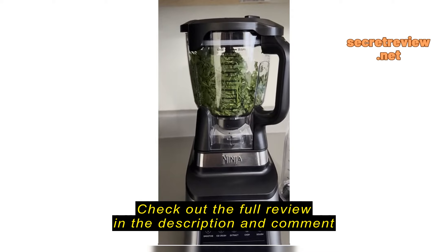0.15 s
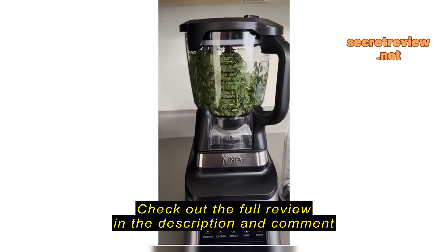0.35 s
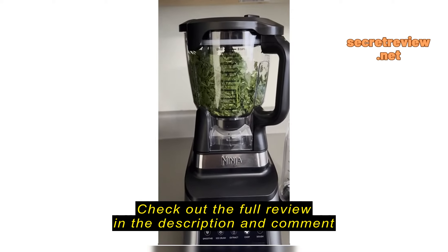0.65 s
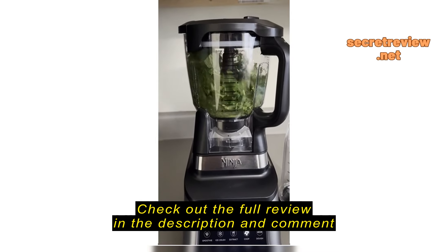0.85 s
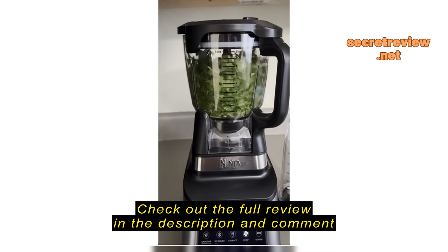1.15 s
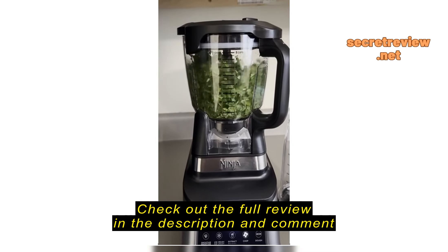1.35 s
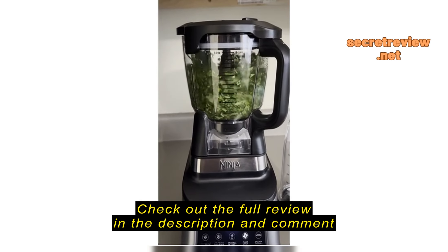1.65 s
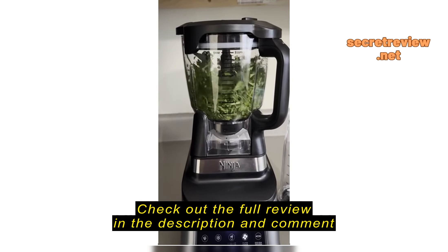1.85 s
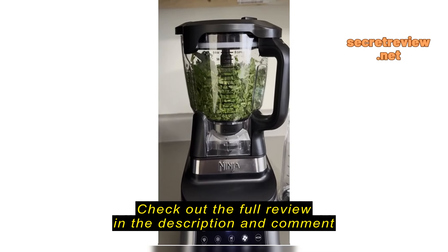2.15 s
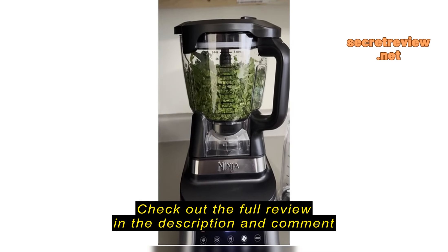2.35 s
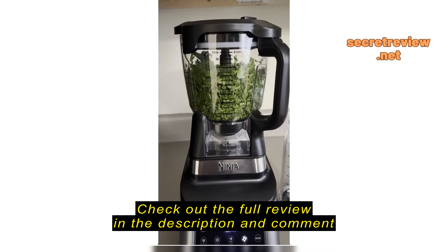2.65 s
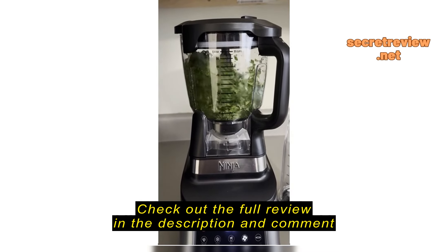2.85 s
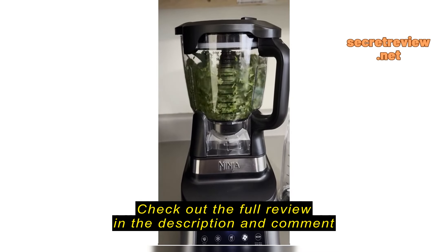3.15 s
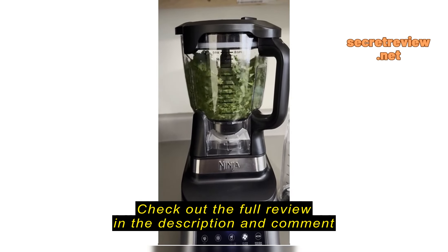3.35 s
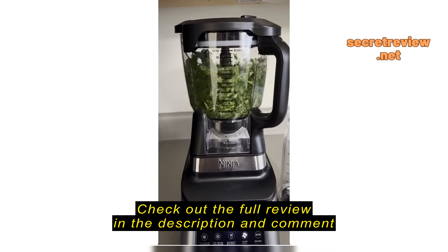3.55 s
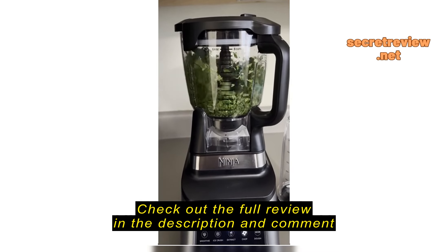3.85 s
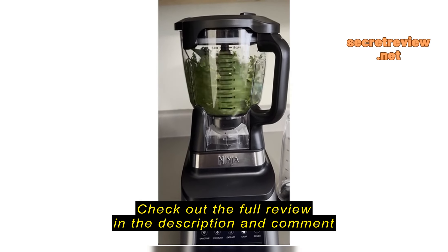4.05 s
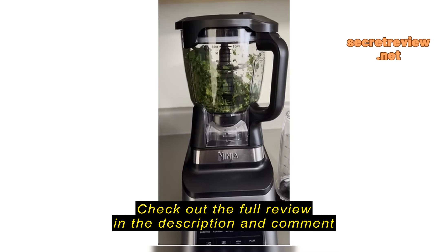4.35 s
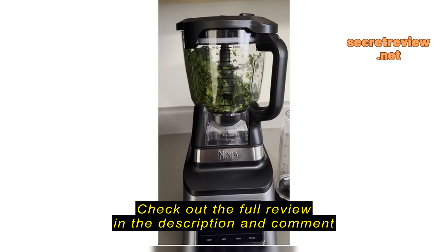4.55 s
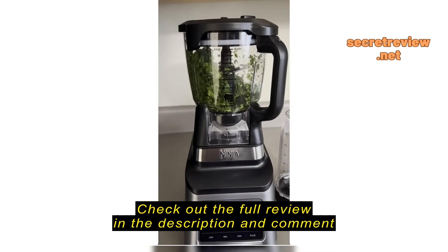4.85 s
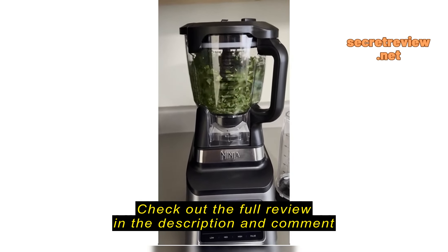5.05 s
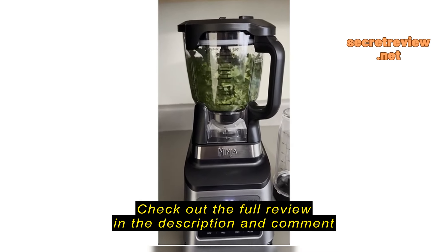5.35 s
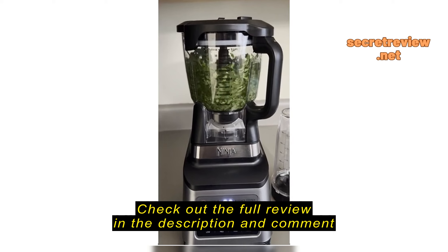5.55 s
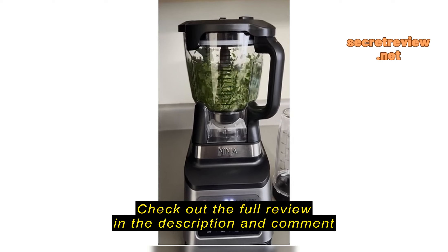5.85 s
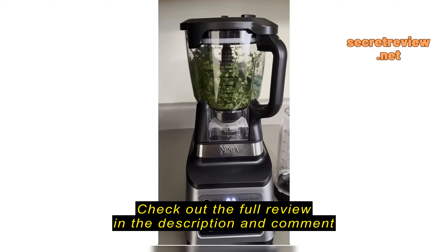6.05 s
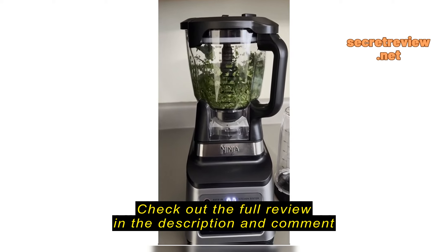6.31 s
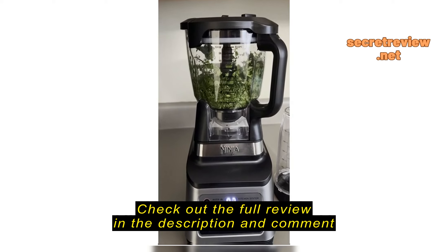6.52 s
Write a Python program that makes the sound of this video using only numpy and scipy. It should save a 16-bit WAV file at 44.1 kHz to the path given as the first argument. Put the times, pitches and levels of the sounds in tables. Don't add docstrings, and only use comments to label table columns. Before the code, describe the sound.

Close by in a quiet kitchen, a blender already at full power roars, then coasts down with a falling whine as leaves batter the plastic jug. After a short pause of low room rumble, a second press kicks in sharply, knocks loudly and winds down. A third pulse repeats this and dies away. A hand-held two-port microphone picks up faint taps on its case.

```python
import sys
import numpy as np
from scipy import signal
from scipy.fft import rfft, irfft, next_fast_len
from scipy.io import wavfile

SR = 44100
rng = np.random.default_rng(int(sys.argv[2]) if len(sys.argv) > 2 else 0)


def voltage_ratio(decibels):
    exponent = np.asarray(decibels, float) / 20
    return 10 ** exponent


def unload_wav(signal):
    wavfile.write(
        sys.argv[1],
        SR,
        np.round(np.clip(np.atleast_2d(signal).T, -1, 1) * 32767).astype(np.int16),
    )


N = 294588
TIME = np.arange(N) / SR
SIZE = next_fast_len(N + SR)
HZ = np.maximum(np.arange(SIZE // 2 + 1) * SR / SIZE, 1)
TOP_HZ = 15950
RIPPLE_HZ = 120.0

# start_s, full_speed_s
PULSES = [
    (-.43, .045),
    (2.078, 2.56),
    (4.577, 5.085),
]
# pitch_hz, width_hz, level_db over the broad colour
BASE_MODES = [(66, 8, 15), (118, 30, 6), (145, 30, 3), (207, 24, 9), (340, 20, 17)]


def rms_one(x):
    return x / np.sqrt(np.mean(x ** 2) + 1e-20)


def in_time(tables):
    s, *columns = np.concatenate(tables).T
    return [np.interp(TIME, s, column) for column in columns]


def running(tables):
    return sum((TIME >= rows[0][0]) & (TIME <= rows[-1][0]) for rows in tables)


def at_hz(points):
    hz, level = np.array(points).T
    return np.interp(np.log(HZ), np.log(np.maximum(hz, 1)), level)


def filtered(x, response):
    return irfft(rfft(x, SIZE) * response, SIZE)[..., :N]


def modes(table):
    response = 1
    for hz, width_hz, db in table:
        response = response + (voltage_ratio(db) - 1) / (1 + 1j * (HZ - hz ** 2 / HZ) / width_hz)
    return response


def band(low_hz, high_hz):
    return 1 / np.sqrt((1 + (low_hz / HZ) ** 8) * (1 + (HZ / high_hz) ** 8))


def drift(rate):
    every = 40
    r = np.exp(-2 * every * np.pi * rate / SR)
    noise = rng.standard_normal(N // every + 2002)
    slow = signal.lfilter([1], [1, -2 * r, r * r], noise)[2000:]
    return np.interp(np.arange(N) / every, np.arange(len(slow)), rms_one(slow))


def grains(per_s, spread_db, noise):
    sizes = voltage_ratio(spread_db * np.minimum(rng.exponential(1, N), 4)) * rng.choice([-1, 1], N)
    impacts = sizes * (rng.random(N) < per_s / SR)
    return rms_one(impacts) + noise * rng.standard_normal(N)


def room_tone():
    # pitch_hz, level_db (per Hz)
    spectrum = [(20, -18), (50, -6.5), (66, -2.5), (105, -2.5), (130, -4), (170, -21), (220, -11),
                (360, -11.5), (450, -20.5), (850, -29), (1400, -39.5), (1800, -45.5), (4000, -72)]
    # time_s, level_db
    rumble_level = [
        [(1.3, -53.5), (1.7, -49.5), (2.06, -52.5), (3.85, -50.5), (4.56, -59.5), (6.35, -46), (6.68, -48)],
    ]
    # time_s, level_db
    air_level = [
        [(1.3, -59), (2.06, -61), (3.9, -64), (4.56, -66), (6.4, -60.5), (6.68, -63.5)],
    ]
    rumble_db, = in_time(rumble_level)
    air_db, = in_time(air_level)
    low, mid, side = filtered(rng.standard_normal((3, N)), voltage_ratio(at_hz(spectrum)))
    rumble = voltage_ratio(rumble_db + 1.5 * drift(5.6)) * rms_one(filtered(low, band(0.91, 160)))
    side = filtered(side, voltage_ratio(at_hz([(200, -13.0), (500, -0.5), (1500, 3.0)])))
    air = filtered(mid + side * [[1], [-1]], band(91, 30000))
    return rumble + voltage_ratio(air_db + 1.2 * drift(13)) * rms_one(air)


def taps():
    # time_s, peak_db
    touches = [(1.667, -51), (3.828, -43.5), (4.008, -57), (4.218, -58), (6.222, -50), (6.336, -54),
               (6.618, -53), (6.643, -56), (6.663, -60)]
    out = np.zeros(N + SR)
    t = np.arange(SR // 20) / SR
    pitch_hz = 90 + 1000 * np.exp(-t / 0.00406)
    swell = np.exp(-t / 0.013) * (1 - np.exp(-t / 0.0011))
    thud = np.sin(2 * np.pi * np.cumsum(pitch_hz) / SR) * swell
    for s, db in touches:
        out[round(s * SR):][:len(t)] += voltage_ratio(db) * thud
    return out[:N] * [[1], [-1]]


def ports(x):
    # pitch_hz, lead_radians
    phase = [(0, 0), (250, .08), (780, .5), (1810, 0), (2700, -.15), (3600, -.05), (4300, -.5),
             (4900, -3.1), (5300, -5.6), (5750, -6.28), (6700, -6.28), (8000, -7.4), (11700, -9.42),
             (13500, -9.42), (16000, -11.2)]
    # pitch_hz, level_db
    balance = [(250, 0), (680, -1.5), (1000, .6), (1900, 0), (2700, 2.6), (3600, .3), (4600, 1.2),
               (5300, -2), (5700, 0)]
    # pitch_hz, level_db
    diffuse = [(100, -36), (300, -18), (700, -5), (1900, -17), (2500, -7), (3600, -15), (4800, -2),
               (5750, -19), (6700, -19), (8000, -2), (10900, -5), (11900, -19), (13100, -19), (14800, -2)]
    fade_60db_s = 0.2
    half = np.exp(0.5j * np.interp(HZ, *np.transpose(phase))) * voltage_ratio(at_hz(balance) / 2)
    t = np.arange(SR // 2) / SR
    tails = rng.standard_normal((2, len(t))) * voltage_ratio(-60 * t / fade_60db_s) * (t > 0.004)
    tails = rfft(tails / np.sqrt(np.sum(tails ** 2, axis=1, keepdims=True)), SIZE)
    return filtered(x, np.array([half, 1 / half]) + voltage_ratio(at_hz(diffuse)) * tails)


def rotor():
    # after_start_s, turns_per_s
    run_up = [(0, 20), (.123, 245), (.26, 322)]
    # after_full_speed_s, turns_per_s
    coast = [(0, 485), (.16, 420), (.345, 333), (.56, 232), (.68, 190), (.82, 136), (.98, 87), (1.21, 12)]
    spins = []
    for on, top in PULSES:
        rising = [(on + s, turns) for s, turns in run_up]
        falling = [(top + s, turns) for s, turns in coast]
        spins.append(rising + falling)
    turns, = in_time(spins)
    return turns, running(spins)


def current():
    # on_s, off_s
    power = [
        (-.43, .05),
        (2.078, 2.555),
        (4.575, 5.05),
    ]
    fade_s, rise_s, idle = 0.095, 0.045, 0.09
    total = 0
    for on, off in power:
        inrush = idle + np.exp(-((TIME - on) / fade_s) ** 2)
        rise = 1 - np.exp(-np.clip(TIME - on, 0, None) / rise_s)
        total = total + (TIME >= on) * (TIME < off) * inrush * rise
    return total


def fizz():
    # start_s, level_db, fade_s
    bursts = [
        (1.15, -63, .05),
        (2.077, -46, .03),
        (3.7, -62.5, .05),
        (4.577, -46.5, .03),
        (6.204, -51, 0.05),
    ]
    gain = 0
    for s, db, fade_s in bursts:
        gain = gain + voltage_ratio(db) * (TIME >= s) * np.exp(-np.clip(TIME - s, 0, None) / fade_s)
    bright = band(2500, 30000) * (1000 / HZ) ** 0.49
    return gain * rms_one(filtered(rng.standard_normal(N), bright))


def roar():
    turns, spinning = rotor()
    vents = 1 / (1 + 1j * (HZ - 2120.0 ** 2 / HZ) / 670.0) ** 2
    gusts = voltage_ratio(-25.5 + 3.9 * drift(29))
    howl = rms_one(filtered(rng.standard_normal(N), vents))
    return spinning * (turns / 480) ** 3.5 * gusts * howl


def blows():
    # time_s, peak_db, pitch_hz
    strikes = [(0.375, -14, 1440), (0.419, -12, 1400), (0.53, -14.5, 679), (0.608, -25, 1080),
               (0.672, -29, 618), (0.721, -17.5, 1320), (0.84, -14.5, 1440), (2.079, -27, 1283),
               (2.119, -14, 574), (2.178, -11, 1375), (2.219, -9.5, 1548), (2.4, -4, 1410),
               (2.931, -11, 1430), (2.977, -15.5, 1440), (3.069, -12.5, 660), (3.218, -21, 1370),
               (3.297, -13.5, 1365), (3.441, -21.5, 687), (3.59, -32.5, 677), (4.586, -26.5, 614),
               (4.626, -34, 570), (4.674, -20, 1370), (5.001, -12, 1357), (5.248, -6, 1430),
               (5.446, -9.5, 1500), (5.632, -21, 2550), (5.774, -21, 1350), (5.922, -18.5, 1350),
               (6.008, -22.5, 914)]
    # time_s, peak_db
    clicks = [(0.8594, -31), (0.9594, -25), (1.0997, -27.5), (2.1864, -15), (2.2194, -33), (3.5344, -26),
              (3.709, -53), (4.596, -36), (4.627, -15), (6.2285, -51), (6.293, -42)]
    knocks, ticks = np.zeros((2, N + SR))
    t = np.arange(SR // 20) / SR
    chance = rng.standard_normal((len(strikes) + len(clicks), len(t)))
    for (s, db, hz), noise in zip(strikes, chance):
        ring = np.sin(2 * np.pi * hz * t) * np.exp(-t / 0.0045)
        crack = 0.6 * noise * np.exp(-t / 0.0012)
        knocks[round(s * SR):][:len(t)] += voltage_ratio(db - 3.0) * (ring + crack)
    for (s, db), noise in zip(clicks, chance[::-1]):
        ticks[round(s * SR):][:len(t)] += voltage_ratio(db - 11.5) * noise * np.exp(-t / 0.0048)
    return filtered(knocks[:N], band(200, 4900)) + filtered(ticks[:N], band(3200, 11000))


def effort():
    # full_speed_db, driven_db and coasting_db (per tenfold speed), dying_db (per s), lump_share
    bodies = [
        (-22.5, 4, 14.8, 109, 1.1),
        (-23.5, -1.5, 21.6, 117, 0.32),
        (-23.5, 10.5, 32.9, 159, .3),
        (-31.5, 16, 38.4, 183, 0.12),
    ]
    # time_s, level_db
    load = [
        [(0, 1.5), (.2, 0.2), (.45, -0.9), (.7, 0.94), (.9, 0.3), (1.05, -1.1), (1.2, -2), (1.4, 4)],
        [(2.08, -3.7), (2.25, -0.6), (2.55, 0.74), (2.8, -0.54), (3.05, 0.84), (3.3, -0.5), (3.55, -0.2),
         (3.7, -1.3), (3.9, -1)],
        [(4.58, -2), (4.75, -1.15), (5.05, 0.65), (5.3, -0.5), (5.55, -0.2), (5.8, -0.3), (6.05, 0.9),
         (6.2, 2.8), (6.4, 2)],
    ]
    # time_s, level_db
    lumps = [(.06, 2.5), (.765, 5), (.835, -4), (1.048, 4.5), (1.132, 4.5), (2.152, 2), (2.543, 7),
             (3.462, 7), (3.576, 4.5), (4.629, 2.5), (4.98, 3.5), (5.385, 0), (5.932, 5.5), (6.16, -1)]
    stalls = [
        1.162,
        3.703,
        6.208,
    ]
    full_turns, stall_turns = 485, 28.7
    grip_s, lump_s = 0.03, 0.0063
    turns, spinning = rotor()
    load_db, = in_time([*load])
    starts = [on for on, top in PULSES]
    pulse = np.searchsorted(starts, TIME, "right") - 1
    on, top, stall = np.c_[PULSES, stalls].T[:, pulse]
    decades = np.log10(np.clip(turns, stall_turns, None) / full_turns)
    stalled = np.clip(TIME - stall, 0, None)
    grip = 20 * np.log10(1 - np.exp(-(TIME - on) / grip_s) + 1e-4)
    lumps_db = sum(db * np.exp(-0.5 * ((TIME - s) / lump_s) ** 2) for s, db in lumps)
    levels = []
    for db, driven_db, coasting_db, dying_db, share in bodies:
        speed_db = np.where(TIME < top, driven_db, coasting_db) * decades
        levels.append(db + speed_db - dying_db * stalled + grip + load_db + share * lumps_db)
    return levels


def loaded(x, response, table, patchy_db):
    source = rfft(x, SIZE) * response
    rings = 0
    for mode in table:
        ring = irfft(source * (modes([mode]) - 1), SIZE)[:N]
        rings = rings + ring * voltage_ratio(patchy_db * drift(18))
    return irfft(source, SIZE)[:N], rings


def churn():
    # pitch_hz, level_db (per Hz)
    spectrum = [(25, -16), (54, -2), (80, 8.5), (250, 10.5), (450, 6.5), (900, 5.5), (2000, -6),
                (2900, -8.5), (3600, -13), (5000, -21.5), (8000, -28), (11000, -28), (14000, -33),
                (16000, -37)]
    # pitch_hz, width_hz, level_db over the broad colour
    jug_modes = [(632, 38, 11), (1360, 90, 15), (1465, 45, 13), (2160, 60, 6), (2350, 40, 5), (2550, 80, 6),
                 (4200, 250, 4)]
    # pitch_hz, width_hz, level_db over the broad colour
    housing_modes = [(5520, 150, 7), (5860, 100, 4), (7750, 120, 5), (8800, 350, 3), (11400, 400, 2.5)]
    base_db, jug_db, blade_db, fan_db = effort()
    colour = voltage_ratio(at_hz(spectrum))
    tumble = drift(8.6)
    battering = grains(1200, spread_db=4.0, noise=1.0) * voltage_ratio(1.0 * tumble + 0.61 * drift(45))
    thumps = grains(300, spread_db=4.0, noise=0.99)
    pushed, shaken = loaded(thumps, colour * band(0.68, 400), BASE_MODES, patchy_db=2.5)
    brushed, rung = loaded(battering, colour * band(450, 1700), jug_modes[:3], patchy_db=2.5)
    ringing = np.clip(rotor()[0] / 120, 0.3, 1)
    base = ringing * rms_one(pushed + shaken) + (1 - ringing) * rms_one(pushed)
    jug = ringing * rms_one(brushed + rung) + (1 - ringing) * rms_one(brushed)
    blades = sum(loaded(battering, colour * band(1700, 4800), jug_modes[3:], patchy_db=4.0))
    sparks = 1 + 0.22 * current() * np.cos(2 * np.pi * RIPPLE_HZ * TIME)
    gusts = voltage_ratio(0.5 * tumble + 1.2 * drift(30))
    air = grains(4000, spread_db=-1.5, noise=0.36) * sparks * gusts
    fan = filtered(air, colour * modes(housing_modes) * band(4800, 30000))
    layers = [(base, base_db - 3.5), (jug, jug_db - 0.4), (blades, blade_db - 0.1), (fan, fan_db + 3.0)]
    return sum(voltage_ratio(db) * rms_one(x) for x, db in layers)


def motor():
    # multiple, level_db
    ripple = [(1, -17), (2, -26), (3, -31.5), (4, -30.5), (5, -43.5)]
    # turns_per_s, level_db
    unbalance = [(12, -69.5), (45, -59.5), (65, -46.5), (95, -48.5), (135, -39), (210, -39.5), (280, -38),
                 (340, -50.5)]
    # multiple of the rotor speed, level_db
    fan_tones = [(18, -56), (27, -58), (36, -53), (45, -53), (54, -57)]
    turns, spinning = rotor()
    angle = 2 * np.pi * np.cumsum(turns) / SR
    hum = 0
    for k, db in ripple:
        hum = hum + voltage_ratio(db + 2 * drift(8.9)) * np.sin(k * 2 * np.pi * RIPPLE_HZ * TIME)
    shake_db = np.interp(turns, *np.transpose(unbalance)) + 1.5 * drift(8) + 2.0
    shake = filtered(spinning * voltage_ratio(shake_db) * np.sin(angle), modes(BASE_MODES))
    song = 0
    for k, db in fan_tones:
        song = song + voltage_ratio(db + 3 * drift(10)) * np.sin(k * angle) * (k * turns < TOP_HZ)
    return current() * hum + shake + spinning * np.minimum(turns / 330, 1.1) ** 2.5 * song


def scene():
    blender = motor() + churn() + roar() + blows() + fizz()
    return ports(blender) + room_tone() + taps()


def roll_off(x):
    return signal.sosfilt(signal.butter(12, 17080, fs=SR, output="sos"), x)


def record(dry):
    # pitch_hz, level_db (per Hz)
    self_noise = [(1000, 4), (3000, -2), (7000, -5), (10000, -10), (12000, -22)]
    noise = filtered(rng.standard_normal(dry.shape), voltage_ratio(at_hz(self_noise)))
    hiss = voltage_ratio(-83.5) * rms_one(noise)
    rounded = 0.95 * np.tanh(dry / 0.95)
    top_cut = np.clip((TOP_HZ - HZ) / 200, 0, 1)
    return roll_off(filtered(rounded + hiss, top_cut))


dry = scene()
out = record(dry)
unload_wav(out)
```